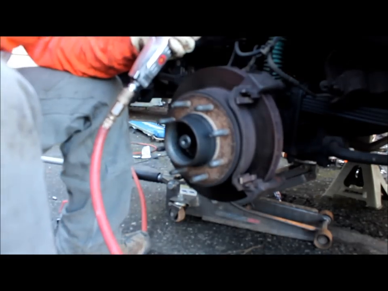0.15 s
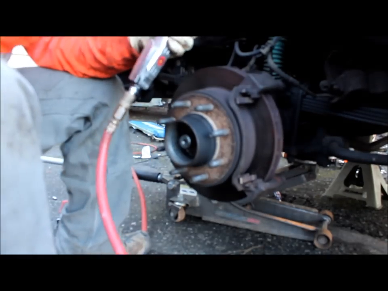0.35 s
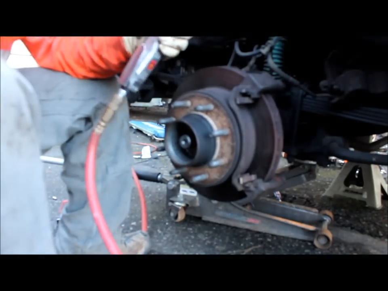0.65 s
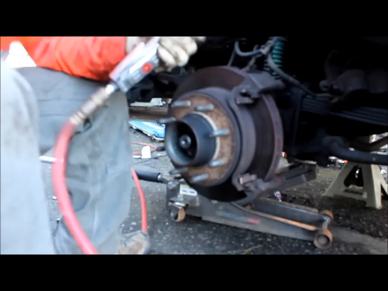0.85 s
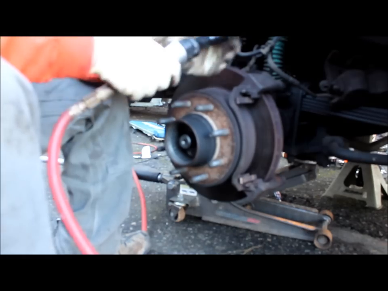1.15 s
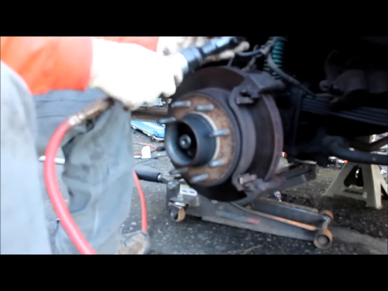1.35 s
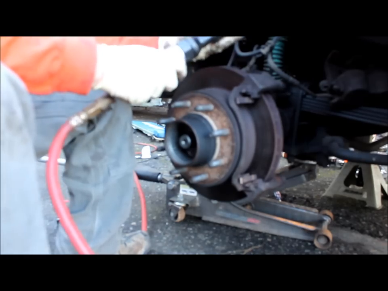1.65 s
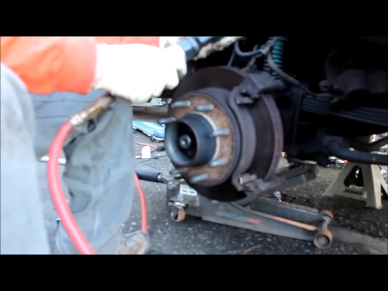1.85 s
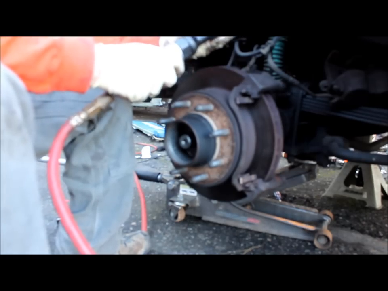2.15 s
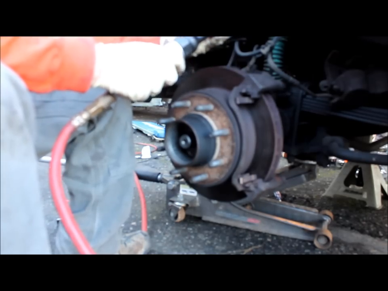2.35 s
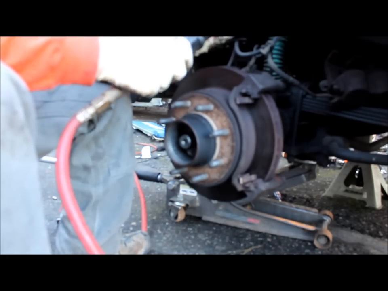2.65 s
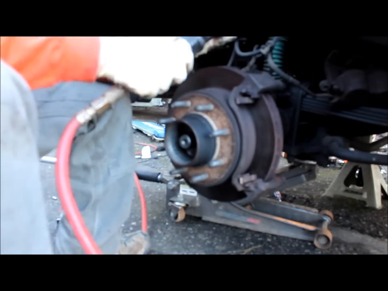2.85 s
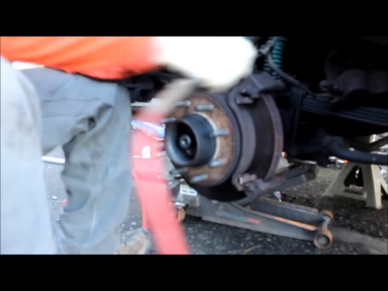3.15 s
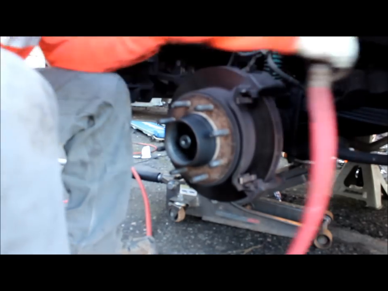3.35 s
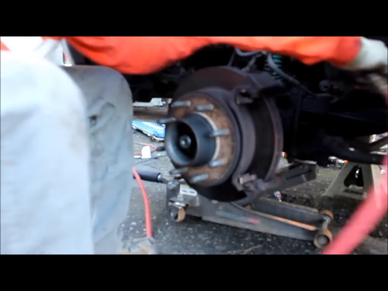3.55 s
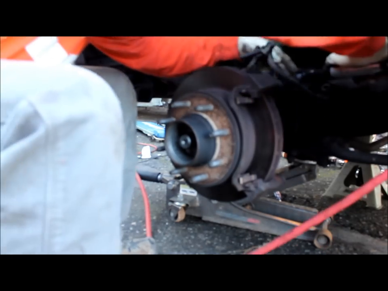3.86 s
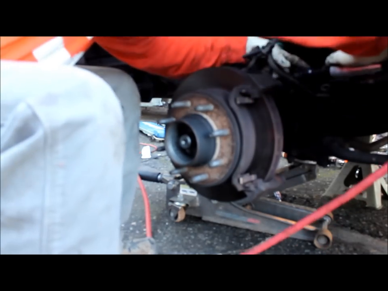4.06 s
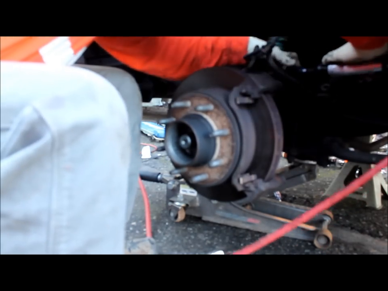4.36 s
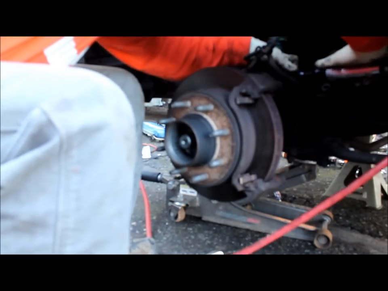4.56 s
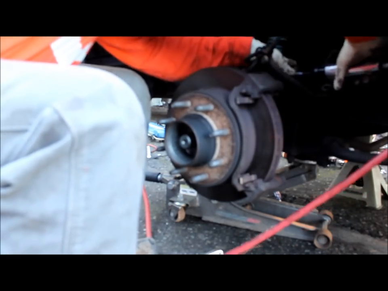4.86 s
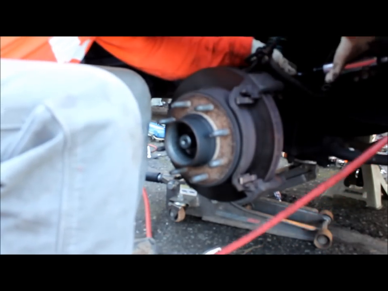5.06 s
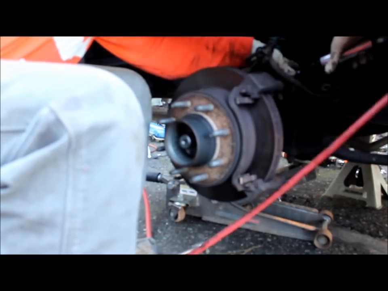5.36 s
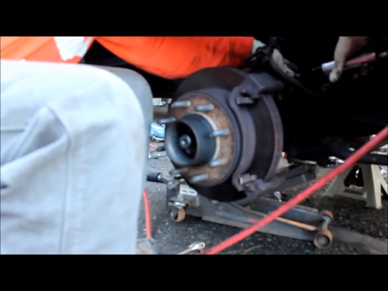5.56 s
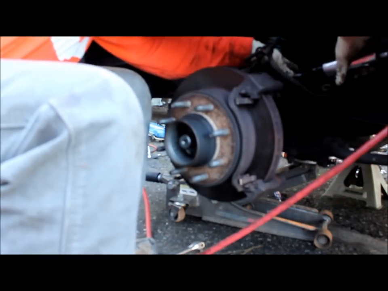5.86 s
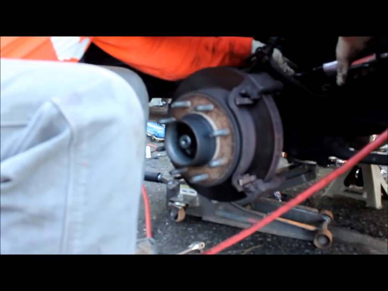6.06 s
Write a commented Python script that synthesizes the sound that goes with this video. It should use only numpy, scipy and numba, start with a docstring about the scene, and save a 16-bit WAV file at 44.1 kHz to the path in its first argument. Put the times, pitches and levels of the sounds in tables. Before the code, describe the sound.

Steady bright air-leak hiss with a faint whistle, metallic socket taps, four brief air-wrench blips, heavy suspension clanks between them, then an abrupt stop.

```python
"""Beside a car's wheel hub: two unsteady sine drones of an engine some way off, under dull yard noise, and close by
an air wrench whose leaking coupling hisses: shaped noise with a whistle. The steel socket taps (noise bursts and
ringing modes), then two trigger blips whoop: noise for exhaust, harmonics of the vane rate for the motor, rattle.
Heavier clanks on the suspension follow, then two more blips with a single light contact between them, and an
abrupt stop. The camera's microphone is mono, and its gain control ducks under each blast."""
import sys
import numpy as np
from scipy import signal
from scipy.fft import rfft, irfft, next_fast_len
from scipy.io import wavfile
from scipy.ndimage import uniform_filter1d, map_coordinates
from numba import njit

SR = 44100
rng = np.random.default_rng(int(sys.argv[2]) if len(sys.argv) > 2 else 0)


def pcm_store(signal):
    """Save signal as 16-bit PCM."""
    levels = np.round(np.clip(np.atleast_2d(signal), -1, 1) * 32767)
    wavfile.write(sys.argv[1], SR, levels.astype(np.int16).T)


N = 274294

# Dull noise of the yard. Each row: frequency in Hz, density in dB per Hz.
YARD = [(20, -29.5), (45, -8), (80, -1), (130, 3), (250, -2), (500, -4.5), (1200, -4.5), (2500, -11),
        (8000, -34)]
# The distant engine's low drone swells and sinks. Each row: time in seconds, level in dB.
LOW_DRONE = [(0, -50), (.6, -41), (1.45, -48), (2.6, -33.5), (3.55, -41.5), (4.85, -34.5), (5.25, -42),
             (5.6, -38)]
# Its upper drone sags and recedes. Each row: time in seconds, pitch in Hz, level in dB.
UPPER_DRONE = [(1.5, 90.2, -39.5), (1.9, 88.6, -53), (4.0, 84.7, -46.5), (5.0, 83, -54)]

# The leak swells while the tool is raised and drops as it turns away; later the hose swings past the camera.
# Each row: time in seconds, hiss gain in dB, top fizz gain in dB.
LEAK = [(0, 3, 1.5), (.35, 2.1, 1.8), (.82, 4.6, 4.8), (1.03, 3.2, 3), (1.13, -.9, -.8), (2.5, 0, .6),
        (3.4, 1, 3.2), (3.9, -.8, -1.2), (5.4, 0, 0)]
# The leak's main hiss. Each row: frequency in Hz, density in dB per Hz.
HISS = [(1500, -24.5), (3000, -18.5), (4400, -2), (5200, -0.5), (6200, 1), (7600, 0.5), (8800, -1.5),
        (10500, -13.5), (16000, -34)]
# The leak's top fizz. Each row: frequency in Hz, density in dB per Hz.
FIZZ = [(7000, -31.5), (10000, -3), (12000, -3.5), (14000, -1), (16000, -6)]
# The leak's low rush. Each row: frequency in Hz, density in dB per Hz.
RUSH = [(300, -16), (1000, -30.5), (2200, 0), (3300, 2.5), (4200, 6.5), (6000, -16.5)]
# The edge whistle climbs as the hose is bent. Each row: time in seconds, pitch in Hz.
WHISTLE = [(0, 6090), (.88, 6310), (.98, 7290), (1.1, 7585), (5.6, 7400)]
# The coupling spits as the hose jerks. Each row: start in seconds, level in dB before the envelope.
SPITS = [(1.078, -16), (2.311, -5)]
HISS_DB, FIZZ_DB, RUSH_DB = -25.5, -30.6, -31.9  # the leak at rest, before its reflections
RUSH_TRADE = .55  # dB of low rush lost for each dB of fizz gained, as the jet turns to face the camera
WHISTLE_DB, WHISTLE_GROWS = -10, 1.6  # against the hiss; extra dB for each dB that the hiss swells

# Steel contacts. Each row: start in seconds, strength in dB, weight from 0 (light tap of the socket) to 1
# (heavy knock on the suspension), bright tick in dB against the strength.
CLANKS = [(.404, -14, 0, 6), (.448, -17, .1, 1), (.694, -.5, 0, 5), (1.077, -21, .1, 9),
          (2.311, -18, .35, 3), (3.348, -11, .25, -10), (3.384, -14, .42, -4), (3.497, -10, .6, -6),
          (3.554, -17, .8, 3), (3.578, -16, .5, 5), (3.697, 1.5, .55, -2), (3.734, 5.5, .87, -20),
          (3.764, -4, .45, -11), (3.788, -15, .92, -12), (4.426, -9, .68, 1), (4.453, -10, .72, -4),
          (4.821, -27, .9, -2), (5.174, -15, .25, 1)]
# Low thud of a contact. Each row: frequency in Hz, density in dB per Hz.
THUD = [(80, -30), (160, -15), (220, 0), (330, -8.5), (470, 0.5), (630, 3.5), (900, -4), (1280, 1),
        (1700, -3.5), (4000, -38)]
# Middle clack of a contact. Each row: frequency in Hz, density in dB per Hz.
CLACK = [(500, -35), (1150, -18.5), (1500, -2.5), (1950, 1.5), (2450, -3), (2900, -6), (3350, -2),
         (3900, -6), (4700, -7), (7000, -11), (16000, -37.5)]
# Bright tick of a contact. Each row: frequency in Hz, density in dB per Hz.
TICK = [(2000, -28), (4000, -0.5), (5500, 5), (8000, 2.5), (11000, -8.5), (16000, -5)]
# Ring of the suspension. Each row: frequency in Hz, level in dB, time to fall 60 dB in seconds.
STEEL = [(225.4, -2.5, .08), (455, -3, 0.12), (537, -6.5, 0.098), (716, -7, 0.12), (1380, 1.5, 0.049),
         (1542, 0.5, .09), (1662, -2.5, 0.18), (2190, -3.5, 0.151), (2640, -10.5, 0.32), (2940, -8.5, 0.15),
         (3190, -11.5, 0.22), (3860, -11.5, 0.18), (4020, -13, 0.19), (4790, -12, 0.11),
         (7360, -15.5, 0.41)]
# Short ring of the hand-held socket. Each row: frequency in Hz, level in dB, time to fall 60 dB in seconds.
SOCKET = [(1792, -7, 0.019), (2172, -4, 0.0459), (2915, -5, 0.058), (3720, -8, 0.038), (5800, -7.5, .03)]
THUD_DB, THUD_PER_WEIGHT_DB = -25, 30  # a weightless tap, against its strength; what full weight adds
STEEL_DB, STEEL_PER_WEIGHT_DB = -27, 20  # the suspension's ring, in the same way
CRACK_DB = -5.5  # the first instant of a contact, against its strength
FALL_S, FALL_PER_WEIGHT_S = .035, .015  # base 60 dB fall of a light tap, scaled for each band; what weight adds
# After the loudest knock the socket chatters into its seat.
CHATTER_S, CHATTER_GAP_S, CHATTER_DB, CHATTER_WEIGHT, CHATTER_TICK_DB = 3.843, .025, -18, .42, -5

# Trigger blips. Each row: valve opens, rotor starts, air fades and rotor coasts, all in seconds; vane rate that
# the rotor heads for in Hz; exhaust in dB, buzz in dB, buzz fall in dB per octave, coasting whoop in dB, kick in dB.
BLIPS = [(1.649, 1.656, 1.777, 1.772, 1392, -0.5, -.3, 1.5, 1.5, 3),
         (2.063, 2.073, 2.192, 2.193, 1419, -1, -1, 2, 0.5, 1.5),
         (4.964, 4.979, 5.074, 5.084, 1433, -2.5, -1.2, -1.5, -2, -4.5),
         (5.575, 5.592, 5.62, 5.664, 985, -5, -1.8, 1.5, -9, -5.5)]
# Exhaust jet. Each row: frequency in Hz, density in dB per Hz.
JET = [(60, -52), (400, -23), (750, -7.5), (1200, 1.5), (2000, 2), (4200, 2), (7000, 1.5), (10000, 0),
       (12000, -6.5), (16000, 1.5)]
# Resonances of the exhaust port. Each row: frequency in Hz, width in Hz, level in dB.
PORT = [(940, 340, -2), (1700, 330, -1.5), (2430, 490, -3), (2754, 106, 2.5), (3960, 240, 0.5),
        (5620, 99, -6), (9300, 1100, -19.5)]
# Resonances of the motor housing. Each row: frequency in Hz, width in Hz, level in dB.
HOUSING = [(415, 150, -14.5), (753, 140, 3), (1052, 310, 1), (2830, 110, 0), (3930, 220, -5.5),
           (9100, 730, -2.5)]
# Kick of the rotor as it starts. Each row: frequency in Hz, density in dB per Hz.
KICK = [(80, -37.5), (150, -18), (215, 4), (310, -5.5), (430, 11), (600, -4.5), (1000, 6.5), (1500, -9),
        (3000, -24.5), (8000, -38.5)]

# Fading of the echo from car body and ground. Each row: frequency in Hz, time to fall 60 dB in seconds.
WALLS = [(150, 0.45), (1500, 0.19), (6000, 0.23), (15000, 0.034)]
END_S, TOP_HZ = 5.712, 15780  # where the sound stops; top of the microphone channel's band


def amp(db):
    """Amplitude factor for a level in dB."""
    return 10 ** (np.asarray(db) / 20)


def unit(x):
    """x scaled to rms 1."""
    return x / np.sqrt(np.mean(x ** 2) + 1e-20)


def clock():
    """Time of every sample in seconds."""
    return np.arange(N) / SR


def since(s):
    """Seconds elapsed since s, zero before."""
    return np.maximum(clock() - s, 0)


def along(points, hz):
    """Values of (Hz, value) points, interpolated on a log frequency axis."""
    f, v = np.transpose(points)
    return np.interp(np.log(hz + 1), np.log(f + 1), v)


def curves(rows):
    """One value per sample for each column after the time."""
    s, *cols = np.transpose(rows)
    return [np.interp(clock(), s, c) for c in cols]


def wobble(rate):
    """A smooth random curve, rate knots a second."""
    knots = rng.standard_normal(int(N * rate / SR) + 4)
    return map_coordinates(knots, [clock() * rate])


def filtered(x, response):
    """x shaped by a response of frequency, padded so that its tail does not wrap round."""
    m = next_fast_len(N + 8192)
    return irfft(rfft(x, m) * response(np.fft.rfftfreq(m, 1 / SR)), m)[:N]


def noise(spectrum):
    """Coloured noise of rms 1."""
    return unit(filtered(rng.standard_normal(N), lambda hz: amp(along(spectrum, hz))))


def swell(s, rise, decay):
    """An envelope that starts at s, rises and dies away, with time constants in seconds."""
    return (1 - np.exp(-since(s) / rise)) * np.exp(-since(s) / decay)


def resonances(modes):
    """Response of a cavity: one band-pass peak a mode, in alternating polarity."""
    def response(hz):
        total = 0
        for k, (centre, width, db) in enumerate(modes):
            damping = 1j * hz * width
            total = total + (-1) ** k * amp(db) * damping / (centre * centre - hz * hz + damping)
        return total
    return response


def drone(hz):
    """An engine tone of rms near 1 whose pitch and level waver."""
    phase = 2 * np.pi * np.cumsum(hz * (1 + 0.0072 * wobble(9))) / SR
    return np.sqrt(2) * np.sin(phase) * amp(1.5 * wobble(11))


def background(low_hz=74.5):
    """Two unsteady drones of an engine some way off, over the dull noise of the yard."""
    low_db, = curves(LOW_DRONE)
    upper_hz, upper_db = curves(UPPER_DRONE)
    return amp(low_db) * drone(low_hz) + amp(upper_db) * drone(upper_hz) + amp(-34) * noise(YARD)


def near_echoes(x, share, sway, count=5):
    """Hand, hub and ground reflect the jet; their paths drift as the tool moves, so the hiss phases."""
    out = x.copy()
    for path_s in np.geomspace(.0006, .004, count):
        delay = path_s * SR * np.exp(sway * wobble(2))  # in samples
        out += share * map_coordinates(x, [np.arange(N) - delay], order=3)
    return out / np.sqrt(1 + count * share ** 2)


def eddies(width_hz):
    """Slow random flutter of rms 1 that broadens a tone into a breathy band."""
    return unit(filtered(rng.standard_normal(N), lambda hz: 1 / (1 + (hz / width_hz) ** 2)))


def edge_whistle(hiss_gain, width_hz=400, wander_db=1.6, drift=.015):
    """A breathy tone, set against the hiss, that grows with it and shifts as the hose bends."""
    level_db = WHISTLE_DB + WHISTLE_GROWS * hiss_gain + wander_db * wobble(3)
    pitch_hz = curves(WHISTLE)[0] * (1 + drift * wobble(3))
    phase = 2 * np.pi * np.cumsum(pitch_hz) / SR
    return amp(level_db) * (eddies(width_hz) * np.cos(phase) + eddies(width_hz) * np.sin(phase))


def leak(rush_wander_db=1.8):
    """Air escapes from the coupling all the time: turbulent noise in three bands, spits and a whistle."""
    hiss_gain, fizz_gain = curves(LEAK)
    hiss_amp = amp(HISS_DB + hiss_gain)
    rush_db = RUSH_DB - RUSH_TRADE * fizz_gain + rush_wander_db * wobble(5.13)
    spits = sum(amp(db) * swell(s, rise=0.0012, decay=0.0038) for s, db in SPITS)
    fizz_amp = amp(FIZZ_DB + fizz_gain) + spits
    air = hiss_amp * noise(HISS) + fizz_amp * noise(FIZZ) + amp(rush_db) * noise(RUSH)
    air += hiss_amp * edge_whistle(hiss_gain)
    return near_echoes(air * amp(.4 * wobble(16)), share=0.229, sway=0.094)


def ring(modes, t):
    """Decaying modes, struck at new strengths and phases each time."""
    out = np.zeros(len(t))
    for hz, db, t60 in modes:
        luck, turn = rng.standard_normal(2)
        out += amp(db + 2 * luck - 60 * t / t60) * np.sin(2 * np.pi * (hz * t + turn))
    return out


def chatter(scatter_db=2.5, count=4):
    """A quick run of small contacts, as rows like those of CLANKS."""
    rows = []
    for k, (a, b) in enumerate(rng.standard_normal((count, 2))):
        rows.append((CHATTER_S + k * CHATTER_GAP_S, CHATTER_DB + scatter_db * a,
                     CHATTER_WEIGHT + .12 * b, CHATTER_TICK_DB))
    return rows


def clanks(socket_db=-3):
    """Contacts crack, thud, clack, tick and ring; weight adds thud, length and ring of the suspension."""
    out, t = np.zeros(N + SR), np.arange(SR // 2) / SR
    thud, clack, tick = noise(THUD), noise(CLACK), noise(TICK)
    for s, db, weight, edge_db in list(CLANKS) + chatter():
        start = round(s * SR)
        at = slice(start, start + len(t))
        thud_db = db + THUD_DB + THUD_PER_WEIGHT_DB * weight
        tick_db = db + edge_db
        steel_db = db + STEEL_DB + STEEL_PER_WEIGHT_DB * weight
        fall_db = 60 * t / (FALL_S + FALL_PER_WEIGHT_S * weight)
        blow = amp(thud_db - 0.7 * fall_db) * thud[at]
        blow += amp(db - 3.5 - 0.63 * fall_db) * clack[at]
        blow += amp(tick_db - 1.5 * fall_db) * tick[at]  # the treble dies first
        crack = amp(CRACK_DB - 60 * t / 0.0085) * (amp(db) * clack[at] + amp(tick_db) * tick[at])
        metal = amp(steel_db) * ring(STEEL, t) + amp(db + socket_db) * ring(SOCKET, t)
        out[at] += (blow + crack + metal) * (1 - np.exp(-t / 0.00095))
    return out[:N]


def vane_puffs(phase, slope_db, count=8):
    """One puff each time a vane passes the port; unequal vanes vary the puffs over a turn."""
    puffs = sum(amp(-slope_db * np.log2(k)) * np.cos(k * phase + k * k) for k in range(1, count + 1))
    turn = phase / 6  # six vanes
    return puffs * (1 + 0.17 * np.cos(turn) + 0.065 * np.sin(2 * turn))


def wrench(spin_up_s=.0205, coast_s=.052, air_decay_s=0.027, jitter=0.0071,
           jet_db=9, port_db=8, pump_db=11, kick_db=6, rattle_db=-7):
    """The rotor speeds up towards its free speed while air flows, then friction slows it."""
    out = np.zeros(N)
    jet, kick = noise(JET), noise(KICK)
    rattle = unit(filtered(rng.standard_normal(N) * amp(4.5 * wobble(200)), resonances(HOUSING)))
    for opens, starts, fades, coasts, top_hz, exhaust_db, buzz_db, fall_db, whoop_db, jerk_db in BLIPS:
        speed = (1 - np.exp(-since(starts) / spin_up_s)) * np.exp(-since(coasts) / coast_s)
        phase = 2 * np.pi * np.cumsum(top_hz * speed * (1 + jitter * wobble(400))) / SR

        # some air slips past the resting vanes at once; the flow then grows with speed
        valve = (1 - np.exp(-since(opens) / 0.0011)) * np.exp(-since(fades) / air_decay_s)
        flow = valve * (0.14 + speed ** 1.9)
        chopped = 1 + 0.17 * np.cos(phase)  # the vanes chop the jet
        exhaust = amp(jet_db + exhaust_db) * flow * jet * chopped

        # under pressure the puffs are sharp and buzz; a coasting rotor only pumps soft, round ones
        pressure = speed ** 1.5 * np.exp(-since(fades) / 0.031)
        buzz_amp = pressure * amp(port_db + buzz_db + 3.3 * wobble(80))
        buzz = filtered(vane_puffs(phase, slope_db=fall_db) * buzz_amp, resonances(PORT))
        pumping = (1 - np.exp(-since(coasts) / 0.0048)) * speed
        whoop_amp = pumping * amp(pump_db + whoop_db + 2.3 * wobble(130))
        whoop = filtered(vane_puffs(phase, slope_db=12, count=3) * whoop_amp, resonances(HOUSING))

        # the hammer kicks as the rotor jerks into motion, and rattles in the housing when slack
        slack = swell(coasts, rise=0.02, decay=0.06) + 0.47 * swell(opens, rise=0.00077, decay=0.026)
        hammer = amp(kick_db + jerk_db) * kick * swell(starts, rise=0.0072, decay=0.013)
        hammer += amp(rattle_db) * rattle * slack
        out += exhaust + buzz + whoop + hammer
    return out


def wheel_arch(x):
    """A short diffuse echo from the car body and the ground: noise that fades at its own rate in each band."""
    hz, t, z = signal.stft(rng.standard_normal(SR // 3), SR, nperseg=256)
    fading = amp(-60 * t / along(WALLS, hz)[:, None])
    tail = signal.istft(z * fading, SR, nperseg=256)[1]
    late = np.pad(x, (130, 0))  # the echo begins 3 ms after the direct sound
    return signal.fftconvolve(late, tail / np.linalg.norm(tail))[:N]


def scene():
    """Yard, leak, steel and wrench at one point; only steel and wrench excite the echo."""
    far, air, steel, tool = background(), leak(), clanks(), wrench()
    echo = wheel_arch(amp(-17) * tool + amp(-10.5) * steel)
    mono = far + air + steel + tool + echo
    return np.array([mono, mono])


@njit
def follow(x, attack, release):
    """Rises quickly towards x and falls back slowly."""
    out, held = np.empty_like(x), 0.
    for i in range(len(x)):
        held += (x[i] - held) * (attack if x[i] > held else release)
        out[i] = held
    return out


def record(dry, limit_db=-11.0, attack_s=0.0026, release_s=0.02):
    """A mono camera microphone: fast gain control, full-scale clipping, an abrupt stop and a band limit."""
    x = dry[0]
    power = np.abs(uniform_filter1d(x ** 2, size=66))  # averaged over 1.5 ms
    level_db = 10 * np.log10(power + 1e-12)
    excess_db = np.maximum(level_db - limit_db, 0)
    duck_db = follow(excess_db, 1 / (attack_s * SR), 1 / (release_s * SR))
    held = np.clip(x * amp(-duck_db), -1, 1) * (clock() < END_S)
    out = filtered(held, lambda hz: np.exp(-(hz / TOP_HZ) ** 300))
    return np.array([out, out])


dry = scene()
out = record(dry)
pcm_store(out)
```